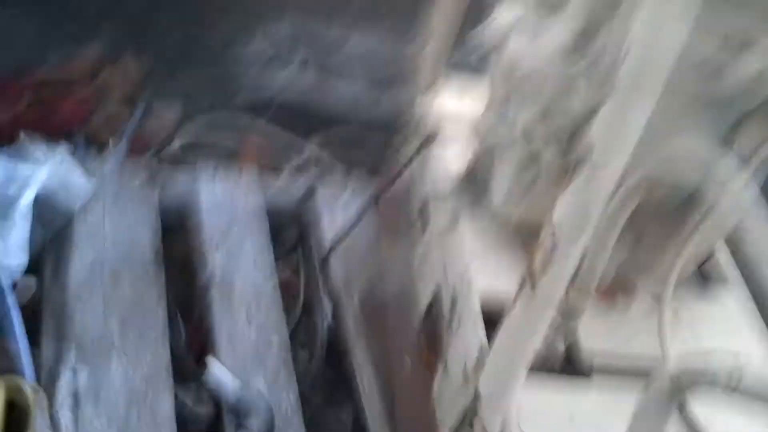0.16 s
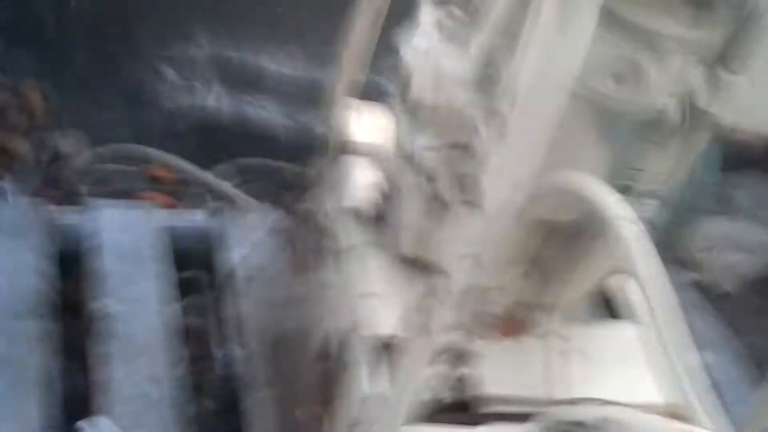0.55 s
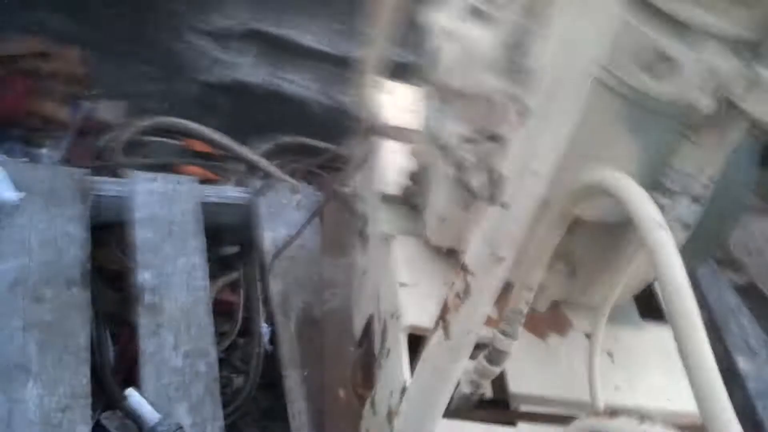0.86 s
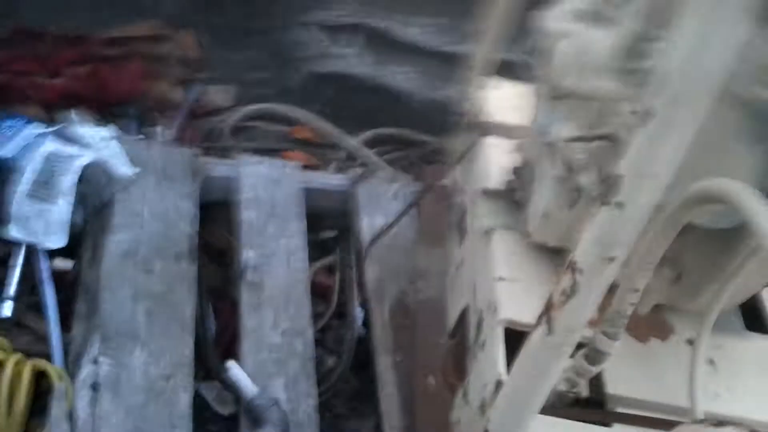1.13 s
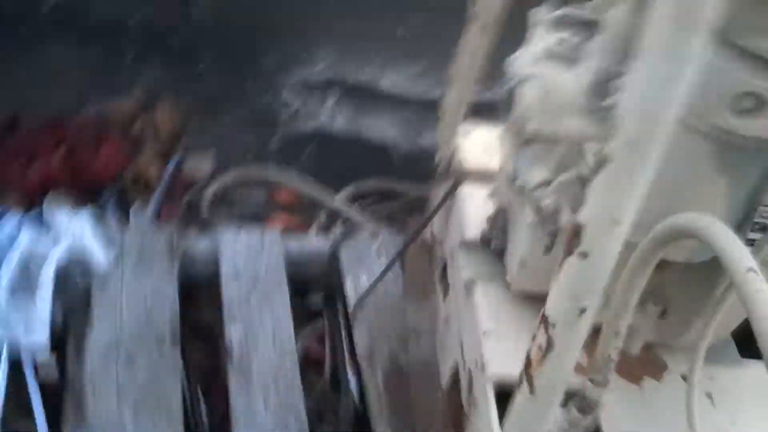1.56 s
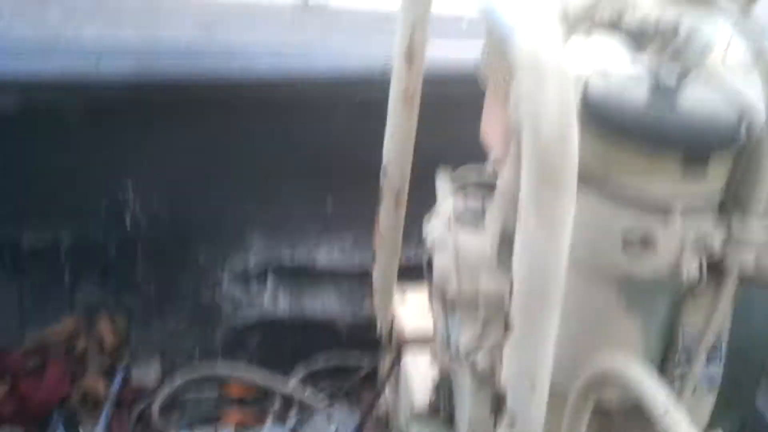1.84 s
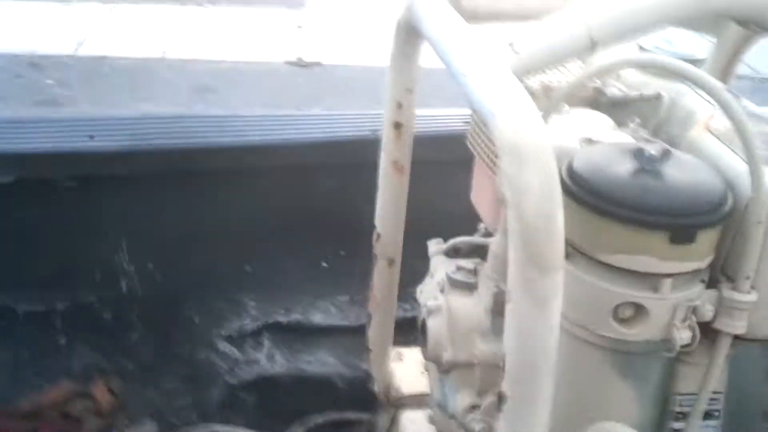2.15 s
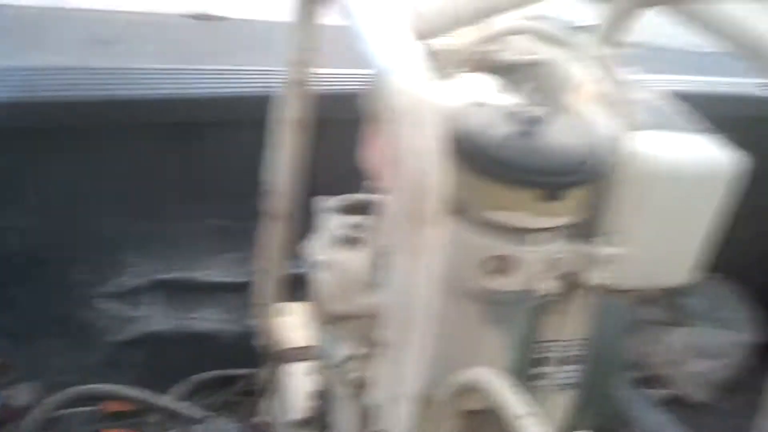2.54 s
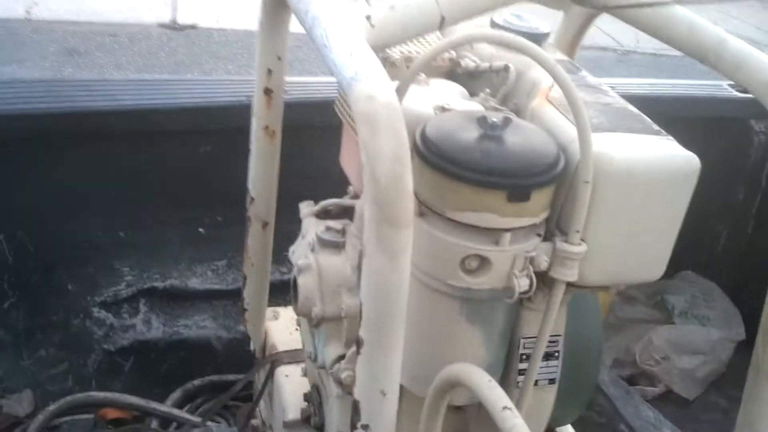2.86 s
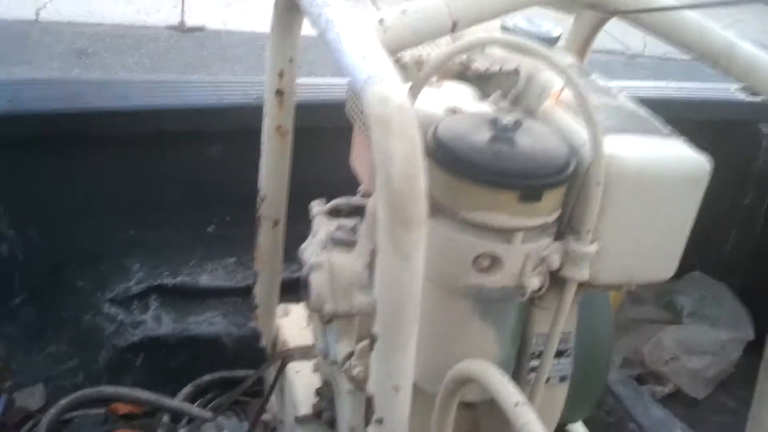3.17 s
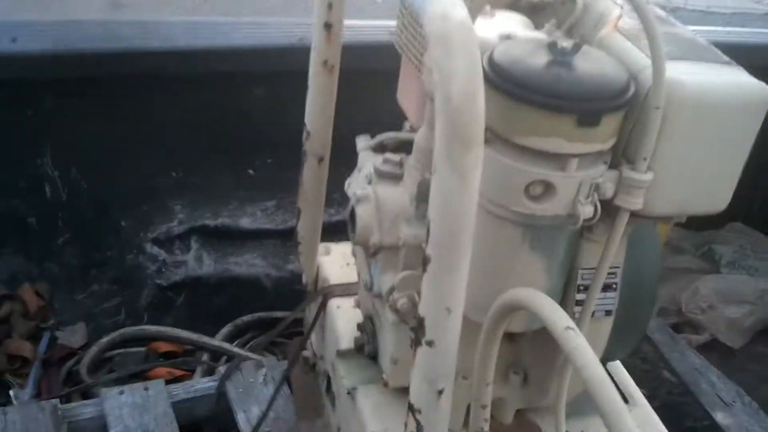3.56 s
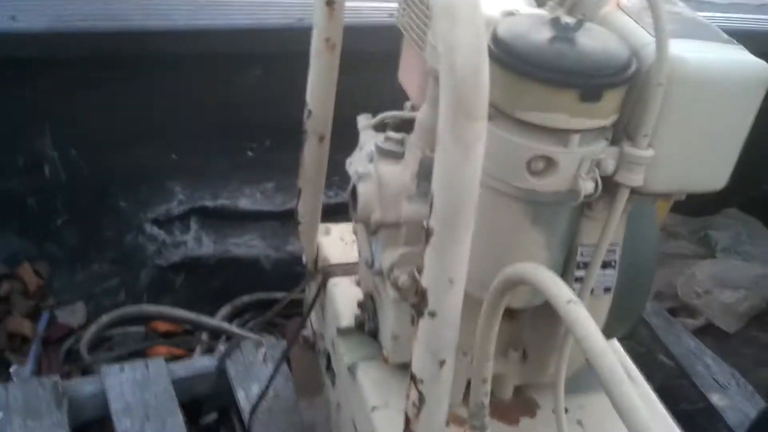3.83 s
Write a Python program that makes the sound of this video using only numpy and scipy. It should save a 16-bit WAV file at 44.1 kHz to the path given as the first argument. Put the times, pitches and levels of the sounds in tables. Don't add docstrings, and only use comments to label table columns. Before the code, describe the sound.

A small single-cylinder diesel engine cranks over, fires with hard knocks, stumbles, then speeds up chugging.

```python
import sys
import numpy as np
from scipy import signal
from scipy.fft import rfft, irfft, next_fast_len
from scipy.io import wavfile
from scipy.ndimage import map_coordinates

SR = 44100
rng = np.random.default_rng(int(sys.argv[2]) if len(sys.argv) > 2 else 0)


def output_pcm(signal):
    pcm = np.clip(np.atleast_2d(signal).T, -1, 1) * 32767
    wavfile.write(sys.argv[1], SR, np.round(pcm).astype(np.int16))


def rack_gain(trim_db):
    fader = np.asarray(trim_db, float)
    return 10 ** (fader / 20)


N = 176400

# (time [s], combustion knock [dB], piston clack [dB])
CRANKED = [
    (.011, -45, -24),
    (.129, -47, -25),
    (.252, -45, -23.5),
    (.378, -48, -26),
    (.5065, -47, -25),
    (.645, -46, -25),
    (.7827, -46, -24),
    (.9334, -60, -25.5),
    (1.0865, -60, -24),
]
# (time [s], combustion knock [dB], piston clack [dB])
FIRED = [(1.2447, -13.5, -22), (1.3923, -16, -16), (1.5255, -13.5, -20), (1.6483, -13, -18),
         (1.762, -12, -20), (1.8678, -14, -24), (1.969, -14.5, -20), (2.0655, -50, -25), (2.163, -46, -25),
         (2.2599, -44, -24), (2.3556, -38, -25), (2.4519, -40, -24), (2.5465, -37, -24),
         (2.6425, -39, -23.5), (2.7358, -21, -19), (2.8305, -32, -23), (2.92, -21.5, -21),
         (3.0095, -26, -20.5), (3.097, -26, -21), (3.1832, -30, -23), (3.2676, -27, -21),
         (3.3505, -19.5, -26), (3.434, -27, -18), (3.5128, -17.5, -15), (3.589, -16.5, -15),
         (3.6637, -17.5, -16), (3.7355, -16.5, -14), (3.8059, -15.5, -14.5), (3.874, -16.5, -14.5),
         (3.9405, -15.5, -14)]
# (time [s], tick level [dB])
SEATS = [(0.0691, -34), (0.188, -31.5), (0.3115, -33), (0.44, -30), (0.5744, -32), (0.7125, -24),
         (0.8557, -24.5), (1.0069, -41.5), (1.1653, -37.5), (1.3206, -37.5), (1.4604, -41), (1.5899, -42),
         (1.7075, -36.5), (1.8154, -35), (1.9202, -38), (2.0192, -33.5), (2.1132, -37.5), (2.2117, -39),
         (2.3068, -37.5), (2.4048, -39), (2.499, -34.5), (2.5929, -37), (2.6889, -32), (2.7843, -30),
         (2.8758, -31), (2.9656, -33), (3.0538, -28), (3.141, -33), (3.2249, -31), (3.3101, -27),
         (3.3942, -37), (3.4753, -35.5), (3.5504, -36.5), (3.6285, -42), (3.6993, -33.5), (3.7741, -38),
         (3.844, -45.5), (3.9095, -42), (3.9727, -36)]
# (time [s], tick level [dB])
LIFTS = [(0.1056, -30), (0.2263, -29), (0.3522, -32.5), (0.481, -29), (0.615, -31.5), (0.7548, -28),
         (0.9009, -39.5), (1.0548, -40.5), (1.2161, -42.5), (1.3675, -44), (1.5024, -42.5), (1.6275, -45),
         (1.7428, -53.5), (1.8508, -48.5), (1.9507, -42), (2.0483, -39.8), (2.1445, -39.0), (2.2407, -41.5),
         (2.3363, -33.5), (2.4343, -38.5), (2.5294, -41), (2.6244, -39.5), (2.7197, -37), (2.8117, -38),
         (2.9044, -38), (2.994, -40.5), (3.081, -39), (3.1678, -38.5), (3.2528, -35), (3.3366, -34),
         (3.4177, -37.5), (3.4982, -38.0), (3.5749, -41.5), (3.652, -46), (3.7229, -37.5), (3.7925, -38.5),
         (3.8606, -42.5), (3.9285, -41.5), (3.9907, -41)]
# (time [s], gain [dB])
GAIN = [(0, 0), (.883, 0), (.886, -15), (1.24, -14), (1.6, -12), (2, -10.5), (2.5, -5), (3, -2),
        (3.36, -.5), (3.39, -7), (4, -5)]

COVER_MODES = [(1040, -1, .2), (790, -8, .15), (1330, -8, .15), (1720, -15, .4), (455, -9, .15),
               (168, -6, .09), (330, -2, .05)]
BLOCK_MODES = [(790, -3, .11), (1035, -1, .09), (1320, -4, .07), (1470, -5, .07), (1718, -19, .6),
               (1850, -5, .055), (2100, -1, .055), (2350, -3, .045), (2900, -6, .035), (3300, -6, .035),
               (3680, -2, .05), (4050, -3, .04), (4290, -1, .05), (4550, -4, .04)]
HEAD_COLD_MODES = [(1040, -4, .09), (1270, 0, .05), (1470, -1, .065), (1620, -6, .04), (1830, -3, .06),
                   (800, -5, .06), (2080, -6, .04), (1400, 8, .008)]
HEAD_HOT_MODES = [(1040, -3, .075), (960, -3, .05), (790, -2, .07), (1330, -3, .05), (1850, 2, .06),
                  (1470, -6, .05), (2150, -3, .04), (1300, 9, .007)]
SKIRT_MODES = [(1038.4, -2, 0.121), (782, -14, 0.13), (1330, -21.5, 0.051), (958.8, -2.5, 0.055)]
PIPE_MODES = [(98, 0, .045), (168, -11, .07), (330, -8, .03)]
ROCKER_MODES = [(175, 0.5, 0.0418), (346.7, -3.5, 0.0334), (486.3, -2.5, 0.0394), (1036.2, -5, 0.0912),
                (1351, -11.5, 0.02)]
TAPPET_MODES = [(2350, 3, 0.0119), (3134, -8.5, 0.01), (3648, -1, 0.0168), (4298, 0, 0.0177),
                (4887, 0.5, 0.0116), (6920, -6, 0.003), (8630, -6.5, 0.00516), (12200, -16, 0.00226)]
BONK_MODES = [(458, 0, .27), (380, -1, .05), (2320, 2, .06), (1163, -5, .06), (1900, -1, .05),
              (620, -2, .03)]
LEAK_MODES = [(8582, -4.5, 0.0025), (9750, 2.5, 0.00131), (13300, 6.5, 0.00104)]

# (frequency [Hz], level [dB])
WHIRR_SPECTRUM = [(40, -45.5), (150, 5.5), (350, -13), (1000, -6.5), (2800, -13.5), (4300, -16),
                  (7500, -28.5), (15000, -31.5)]
# (frequency [Hz], level [dB])
CRACK_SPECTRUM = [(150, -20), (450, -12), (750, -2), (2100, 0), (2900, -6), (4200, -2.2), (6500, -16),
                  (14500, -24)]
# (frequency [Hz], t60 [s])
BED_T60 = [(200, .2), (2000, .15), (10000, .09)]
# (frequency [Hz], level [dB])
SECOND_PORT = [(155, -27), (310, -10), (560, -4.5), (810, -13), (2150, -10), (2650, -41), (14000, -41)]
# (frequency [Hz], phase [rad])
WIDENER_PHASE = [(42, .05), (155, .55), (310, 1.15), (460, 1.45), (660, .45), (910, .32), (1320, .02)]
# (frequency [Hz], level [dB])
WIDENER_GAIN = [(210, -.1), (410, -2.4), (560, -7.5), (810, -.7), (1000, -.3), (1520, 0)]
# (frequency [Hz], level [dB])
MIC_BAND = [(25, -17), (50, -10), (85, 0), (14500, 0), (15250, -3), (15550, -24), (16750, -28),
            (16850, -90)]

TEN_MS_NORM = np.sqrt(SR / 100)
SAME_BLOW, SAME_SEAT = .5, .9
MODE_SPREAD_S = .004
RATTLE_DB, RATTLE_SWING_DB = -33.5, 3.5
WHIRR_DB, WHIRR_SWING_DB = -27.5, 1.5
SWELL_AT_CYCLE, SPEED_DB_PER_OCTAVE = .245, 3.5
KNOCK_DB, CRACK_DB, CRACK_T60_S = -2.5, 2.5, .0838
CLACK_DB, CLACK_T60_S = 4, .022
REBOUND_COLD_CYCLE, REBOUND_HOT_CYCLE, REBOUND_DB = .18, .215, -26.5
EXHAUST_COLD_CYCLE, EXHAUST_FIRED_CYCLE, EXHAUST_S = .2993, .3445, .008
EXHAUST_DB, FIRING_DB = -32.5, 2.5
INTAKE_AFTER_CYCLE, INTAKE_DB, INTAKE_S = .37, -6.5, .023
SEAT_THUMP_DB, SEAT_TICK_DB, LIFT_TICK_DB, TICK_T60_S = -23, -2.5, -2.5, .0278
BONK_AT_S, BONK_DB = .278, -13
HISS_AT_S, HISS_DB, HISS_T60_S = .655, -31, .2
DUCK_AT_S, DUCK_CLICK_DB = .884, -29
PUFF_AT_CYCLE, PUFF_DB, PUFF_DB_PER_DB = .2406, -21.5, .238
LEAK_DB, LEAK_DB_PER_DB, LEAK_T60_S, LEAK_RISE_S = -22, .311, .1614, .0162
BED_DB = -12.5
WIDENER_LAG_S = 16 / SR


def unit(x):
    return x / np.sqrt(np.mean(np.abs(x) ** 2) + 1e-20)


def along(points, hz):
    f, v = np.transpose(points)
    return np.interp(np.log(hz + 1), np.log(f + 1), v)


def filtered(x, response):
    m = next_fast_len(N + SR // 2)
    return irfft(rfft(x, m) * response(np.fft.rfftfreq(m, 1 / SR)), m)[..., :N]


def body(modes, spread_s=0):
    late_s = spread_s * rng.random(len(modes))
    top_hz = max(modes)[0]

    def response(f):
        h = 0
        for k, (hz, db, t60) in enumerate(modes):
            damping_hz = np.log(1000) / np.pi / t60
            delay = np.exp(-2j * np.pi * f * late_s[k])
            h = h + (-1) ** k * rack_gain(db) * 1j * f * delay / (hz * hz - f * f + 1j * f * damping_hz)
        return unit(h / (1 + (f / 2 / top_hz) ** 4))
    return response


def bursts(times, levels_db, t60, rise, same=0):
    t = np.arange(int(t60 * SR)) / SR
    out = np.zeros(N + SR)
    shape = rack_gain(-60 * t / t60) * (1 - np.exp(-t / rise))
    common = rng.standard_normal(len(t))
    for s, db in zip(times, levels_db):
        fresh = rng.standard_normal(len(t))
        puff = shape * (same * common + np.sqrt(1 - same ** 2) * fresh)
        out[max(round(s * SR), 0):][:len(t)] += rack_gain(db) * puff / np.linalg.norm(puff) * TEN_MS_NORM
    return out[:N]


def wobble(rate_hz):
    points = rng.standard_normal(int(N * rate_hz / SR) + 4)
    return map_coordinates(points, [np.arange(N) * rate_hz / SR])


def room(x, t60s):
    hz, t, z = signal.stft(rng.standard_normal((2, SR // 4)), SR, nperseg=256)
    decay = rack_gain(-60 * t / along(t60s, hz)[:, None])
    tail = signal.istft(z * decay, SR, nperseg=256)[1]
    return signal.fftconvolve(x[None], tail / np.linalg.norm(tail[0]), axes=1)[:, :N]


def gain_db(s):
    return np.interp(s, *np.transpose(GAIN))


def crank():
    s = np.array(CRANKED + FIRED)[:, 0]
    s = np.concatenate([[2 * s[0] - s[1]], s, [2 * s[-1] - s[-2]]])
    return s, np.interp(np.arange(N) / SR, s, np.arange(len(s)))


def cycle_s():
    s, _ = crank()
    return np.interp(np.arange(N) / SR, s[:-1], np.diff(s))


def covers():
    swell = np.cos(2 * np.pi * (crank()[1] - SWELL_AT_CYCLE))
    grains = rng.standard_normal(N) * rack_gain(4 * wobble(150) + 2.5 * wobble(14))
    rattle = unit(filtered(grains * rack_gain(RATTLE_SWING_DB * swell), body(COVER_MODES)))
    air = rng.standard_normal(N) * rack_gain(2.5 * wobble(90) + 1.2 * wobble(6))
    whirr = unit(filtered(air * rack_gain(WHIRR_SWING_DB * swell), lambda f: rack_gain(along(WHIRR_SPECTRUM, f))))
    speed_gain = rack_gain(-SPEED_DB_PER_OCTAVE * np.log2(10 * cycle_s()))
    return (rack_gain(RATTLE_DB) * rattle + rack_gain(WHIRR_DB) * whirr) * speed_gain


def combustion():
    s, knock_db, _ = np.transpose(CRANKED + FIRED)
    knock_db = knock_db - gain_db(s) + KNOCK_DB
    blows = np.zeros(N)
    blows[np.round(s * SR).astype(int)] = rack_gain(knock_db) * TEN_MS_NORM
    roar = bursts(s, knock_db + CRACK_DB, CRACK_T60_S, .0004)
    crack = filtered(roar, lambda f: unit(rack_gain(along(CRACK_SPECTRUM, f))))
    return filtered(blows, body(BLOCK_MODES, MODE_SPREAD_S)) + crack


def piston():
    s, _, clack_db = np.transpose(CRANKED + FIRED)
    cold = len(CRANKED)
    clack = np.zeros(N)
    for part, modes in ((slice(cold), HEAD_COLD_MODES), (slice(cold, None), HEAD_HOT_MODES)):
        slaps = bursts(s[part], clack_db[part] + CLACK_DB, CLACK_T60_S, .0006, SAME_BLOW)
        clack += filtered(slaps, body(modes, MODE_SPREAD_S))
    after_cycle = np.where(np.arange(len(s)) < cold, REBOUND_COLD_CYCLE, REBOUND_HOT_CYCLE)
    rebound_s = s + after_cycle * np.gradient(s)
    rebounds = bursts(rebound_s, REBOUND_DB + rng.standard_normal(len(s)), .03, .001, SAME_BLOW)
    return clack + filtered(rebounds, body(SKIRT_MODES))


def fired_cycles():
    s, knock_db, _ = np.transpose(FIRED)
    return s, knock_db - gain_db(s)


def exhaust():
    s, knock_db = fired_cycles()
    t = np.arange(N) / SR
    phase = crank()[1] % 1 - np.where(t < s[0], EXHAUST_COLD_CYCLE, EXHAUST_FIRED_CYCLE)
    hardness = np.interp(t, s, np.clip(knock_db / 10 + 1, 0, 1), left=.4)
    push = np.exp(-8 * (phase * cycle_s() / EXHAUST_S) ** 2)
    push = push * rack_gain(wobble(9) + FIRING_DB * hardness)
    pull = np.exp(-8 * ((phase - INTAKE_AFTER_CYCLE) * cycle_s() / INTAKE_S) ** 2) * rack_gain(INTAKE_DB)
    return rack_gain(EXHAUST_DB) * unit(filtered(push - pull, body(PIPE_MODES)))


def valves():
    (seat_s, seat_db), (lift_s, lift_db) = np.transpose(SEATS), np.transpose(LIFTS)
    thump_db = SEAT_THUMP_DB + rng.standard_normal(len(seat_s))
    thumps = bursts(seat_s, thump_db, .004, .0003, SAME_SEAT)
    s = np.concatenate([seat_s, lift_s])
    tick_db = np.concatenate([seat_db + SEAT_TICK_DB, lift_db + LIFT_TICK_DB]) - gain_db(s)
    ticks = bursts(s, tick_db, TICK_T60_S, .0005)
    return filtered(thumps, body(ROCKER_MODES)) + filtered(ticks, body(TAPPET_MODES))


def loose_parts():
    bonk = bursts([BONK_AT_S], [BONK_DB], t60=.006, rise=.0005)
    hiss = bursts([HISS_AT_S], [HISS_DB], HISS_T60_S, rise=.006)
    hiss_body = body([(9600, 0, .0015), (6800, -6, .002)])
    return filtered(bonk, body(BONK_MODES)) + filtered(hiss, hiss_body)


def duck_click():
    return bursts([DUCK_AT_S], [DUCK_CLICK_DB], t60=.002, rise=.0001)


def gasket():
    s, knock_db = fired_cycles()
    puff_s = s + PUFF_AT_CYCLE * np.gradient(s)
    puff = bursts(puff_s, PUFF_DB + PUFF_DB_PER_DB * knock_db, .03, .004, SAME_BLOW)
    leak = bursts(s, LEAK_DB + LEAK_DB_PER_DB * knock_db, LEAK_T60_S, LEAK_RISE_S)
    puff_body = body([(361, -1.5, .0485), (183.6, -4, .0422)])
    return filtered(puff, puff_body) + filtered(leak, body(LEAK_MODES))


def scene():
    engine = covers() + combustion() + piston() + exhaust() + valves() + loose_parts() + gasket()
    near = engine + rack_gain(BED_DB) * room(engine, BED_T60)[0]
    scattered = room(engine, [(200, .03), (9000, .015)])[0]
    return np.array([near, filtered(scattered, lambda f: rack_gain(along(SECOND_PORT, f)))])


def low_pass(x):
    return signal.sosfilt(signal.butter(12, 16810, fs=SR, output="sos"), x)


def record(dry):
    near, own = dry * rack_gain(gain_db(np.arange(N) / SR))
    near = near + duck_click()

    def widener(f):
        phase = 2 * np.pi * f * WIDENER_LAG_S + along(WIDENER_PHASE, f)
        return rack_gain(along(WIDENER_GAIN, f)) * np.exp(-1j * phase)
    right = own - filtered(near, widener)
    mix = filtered(np.array([near, right]), lambda f: rack_gain(along(MIC_BAND, f)))
    return low_pass(mix)


dry = scene()
out = record(dry)
output_pcm(out)
```